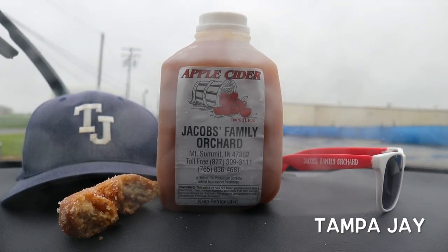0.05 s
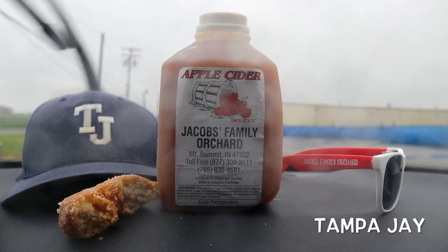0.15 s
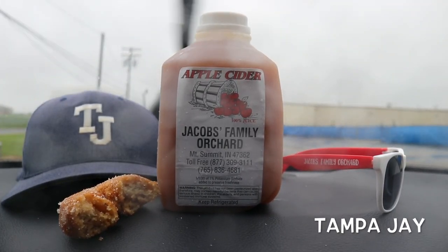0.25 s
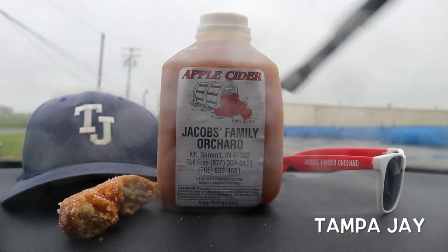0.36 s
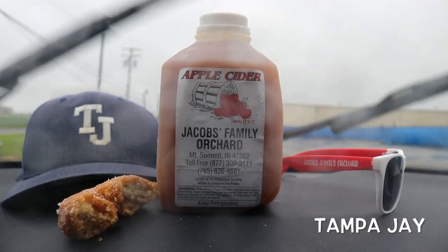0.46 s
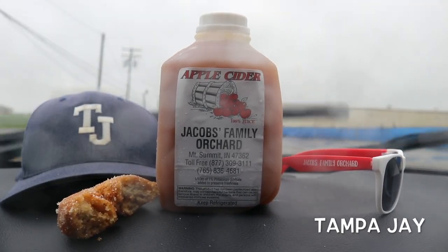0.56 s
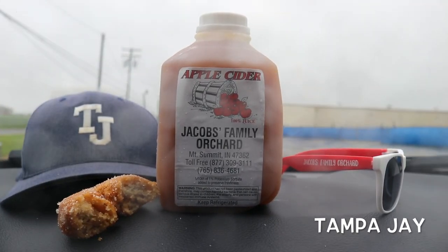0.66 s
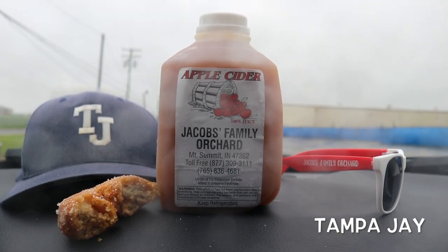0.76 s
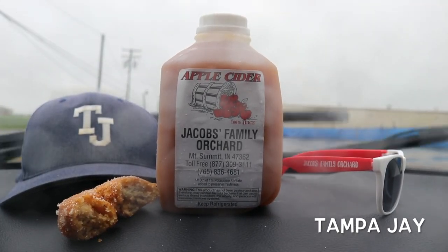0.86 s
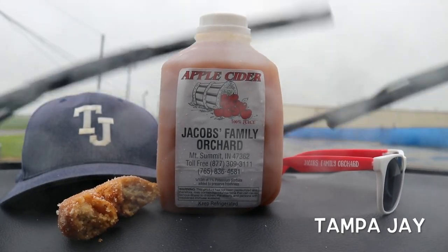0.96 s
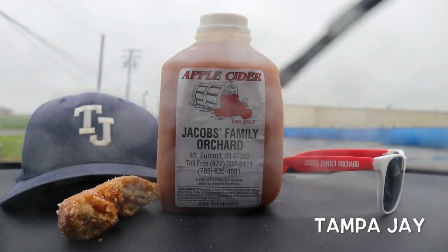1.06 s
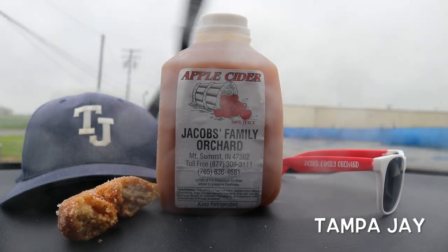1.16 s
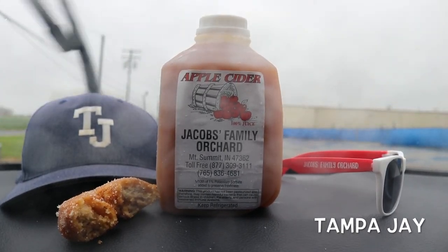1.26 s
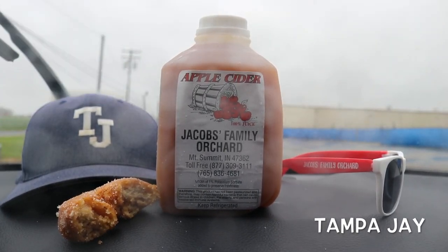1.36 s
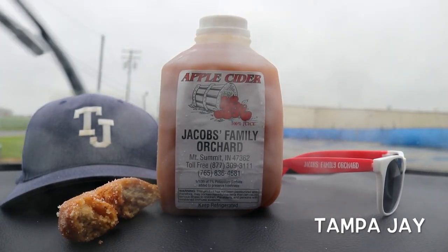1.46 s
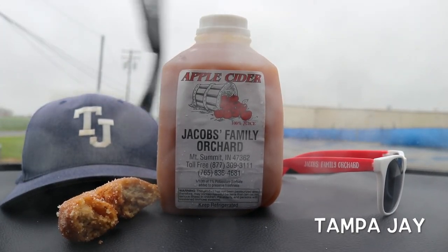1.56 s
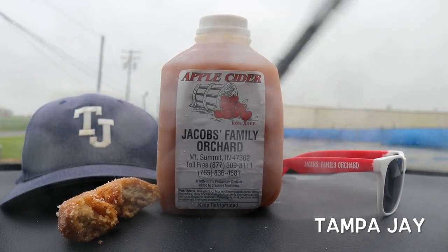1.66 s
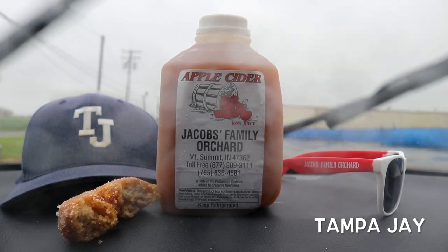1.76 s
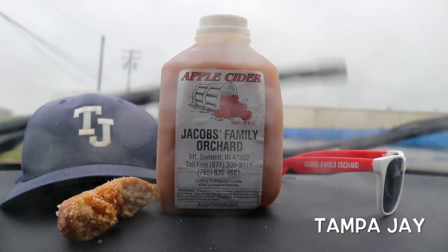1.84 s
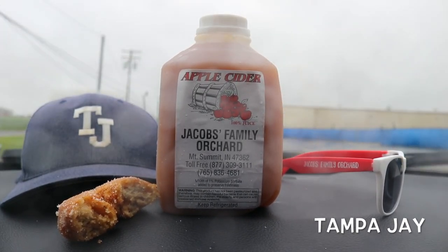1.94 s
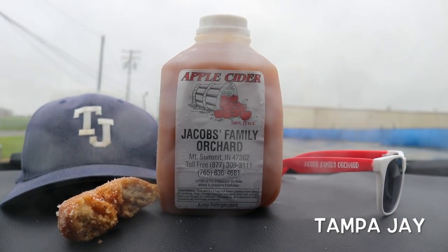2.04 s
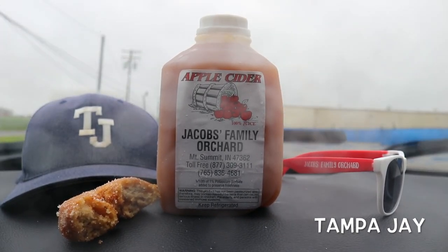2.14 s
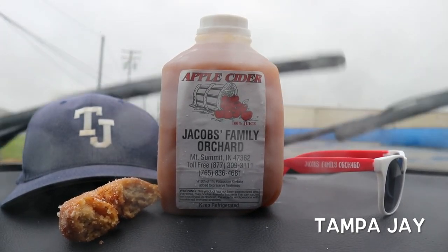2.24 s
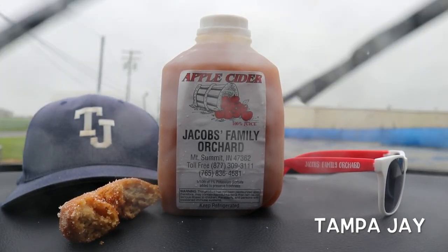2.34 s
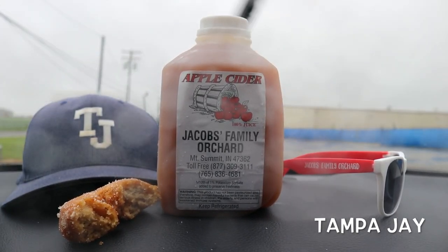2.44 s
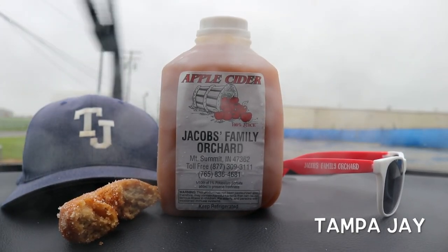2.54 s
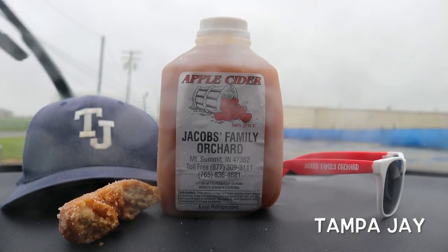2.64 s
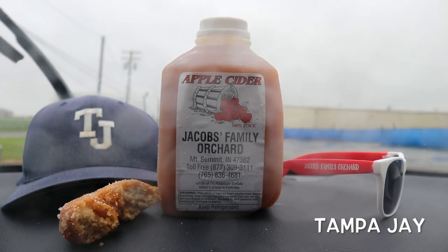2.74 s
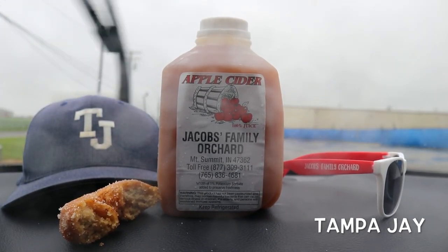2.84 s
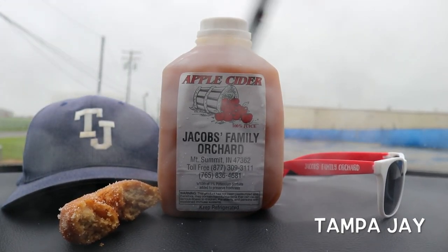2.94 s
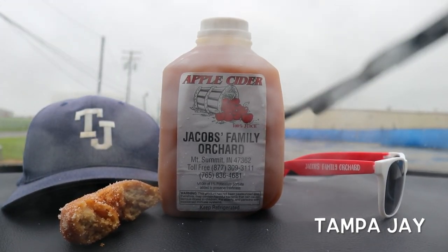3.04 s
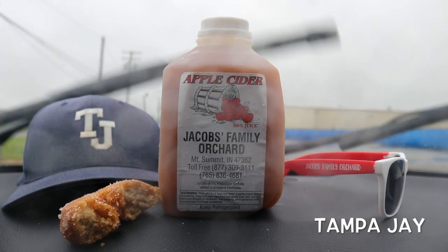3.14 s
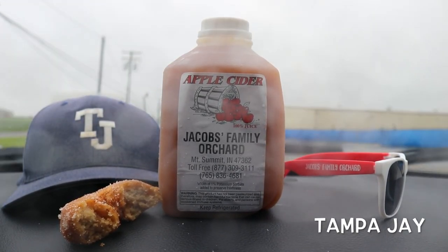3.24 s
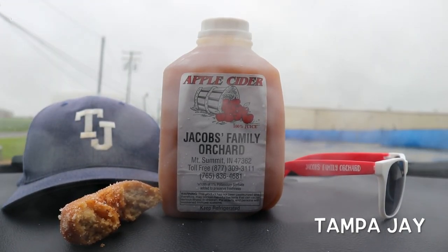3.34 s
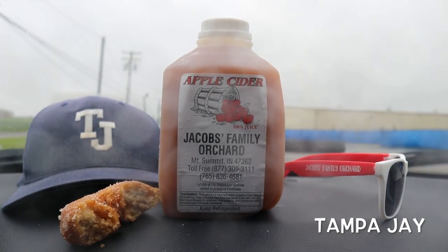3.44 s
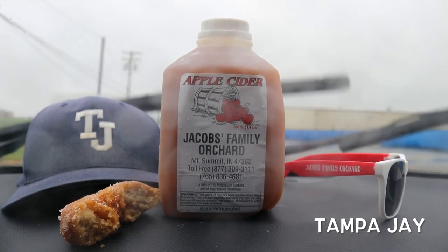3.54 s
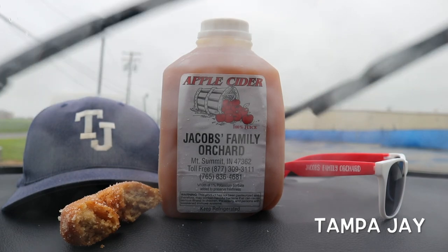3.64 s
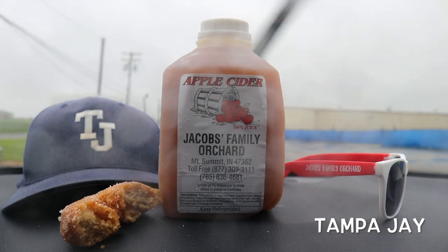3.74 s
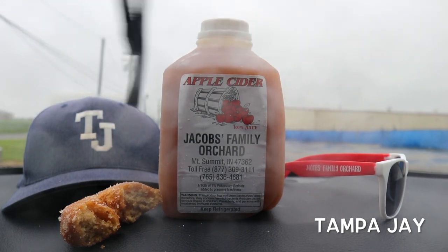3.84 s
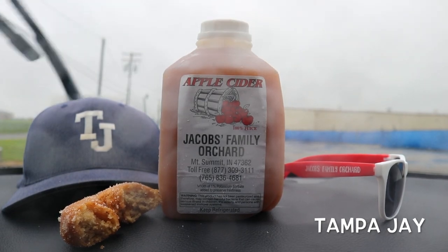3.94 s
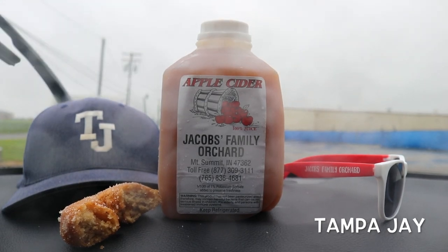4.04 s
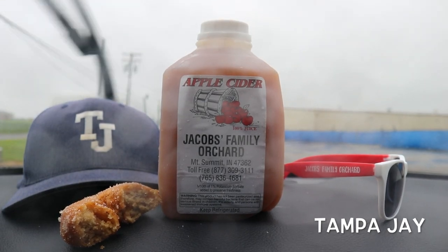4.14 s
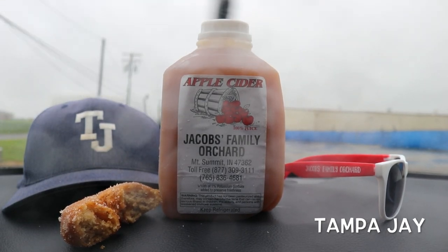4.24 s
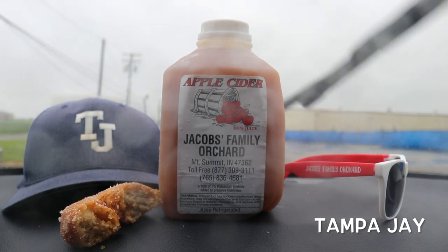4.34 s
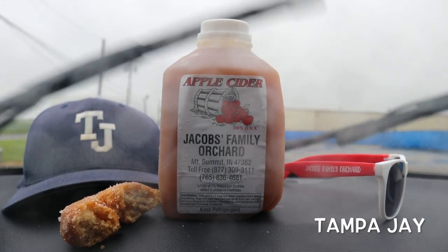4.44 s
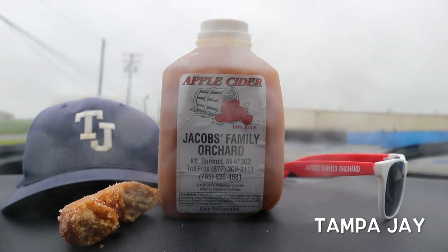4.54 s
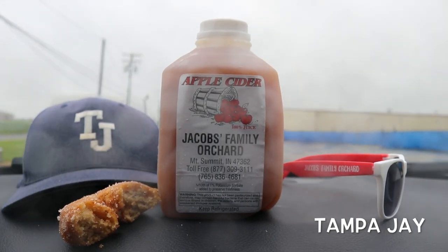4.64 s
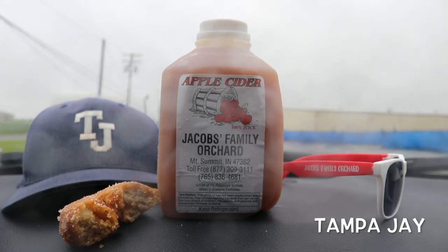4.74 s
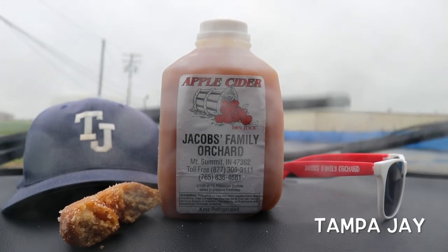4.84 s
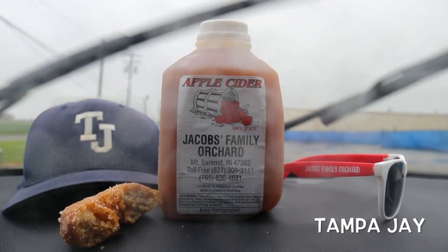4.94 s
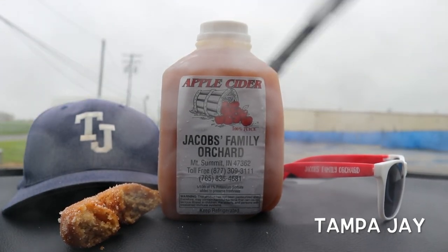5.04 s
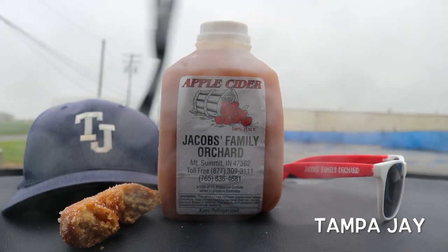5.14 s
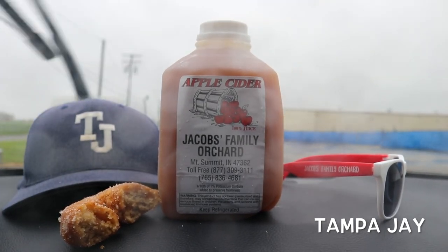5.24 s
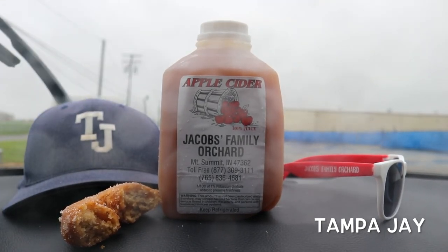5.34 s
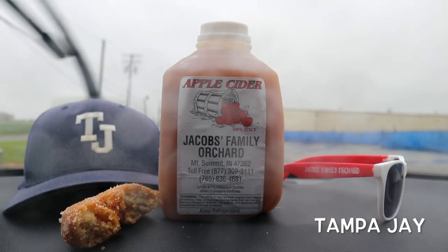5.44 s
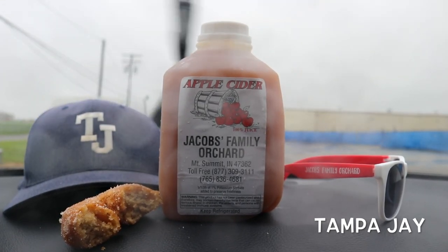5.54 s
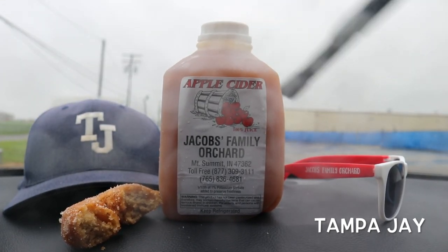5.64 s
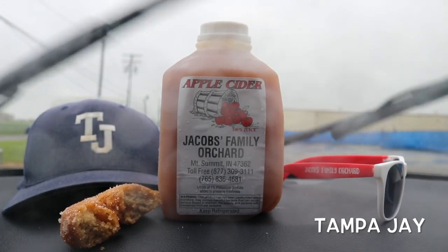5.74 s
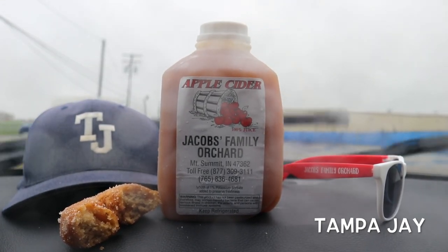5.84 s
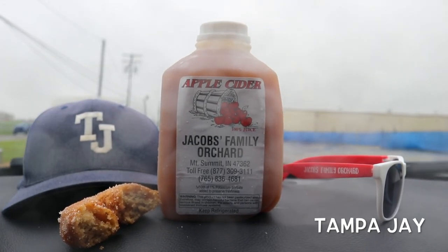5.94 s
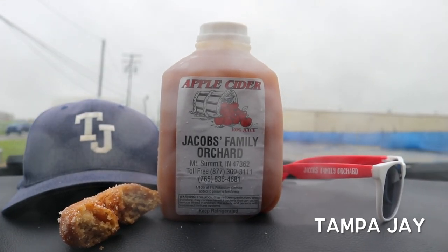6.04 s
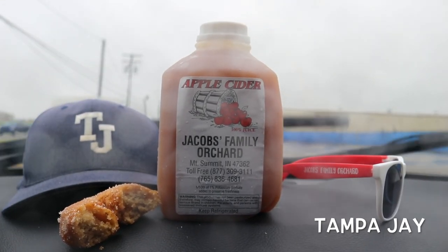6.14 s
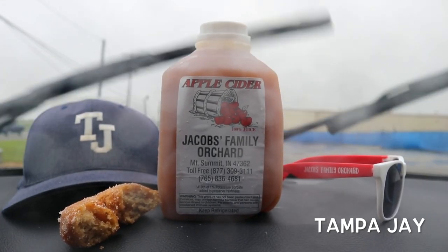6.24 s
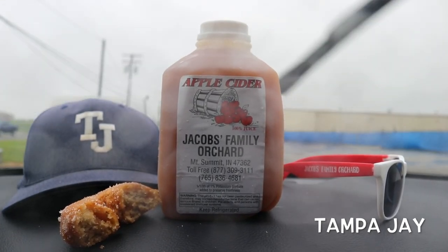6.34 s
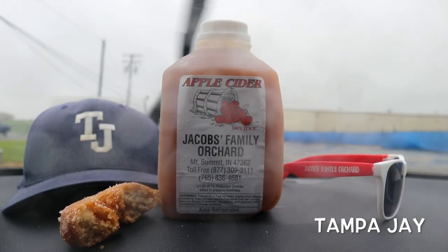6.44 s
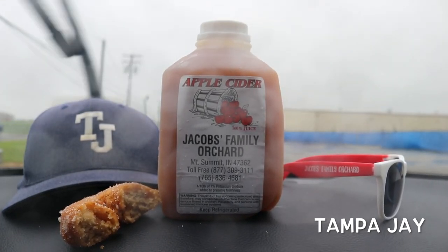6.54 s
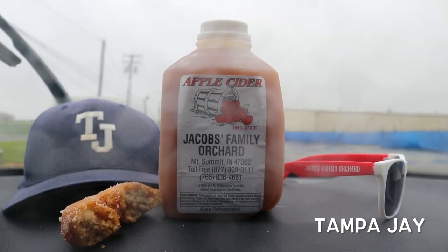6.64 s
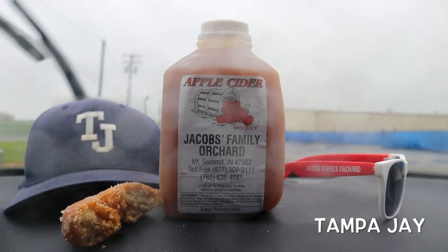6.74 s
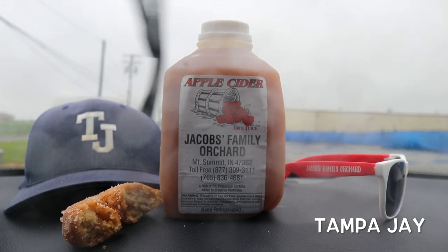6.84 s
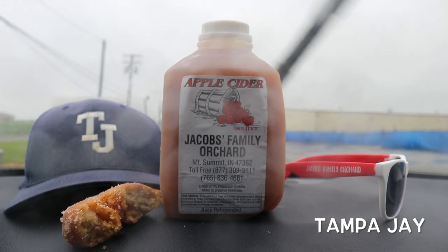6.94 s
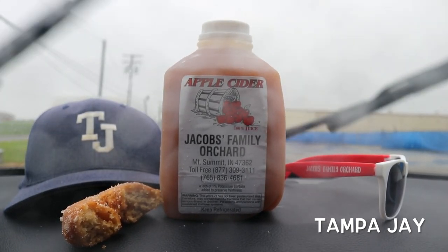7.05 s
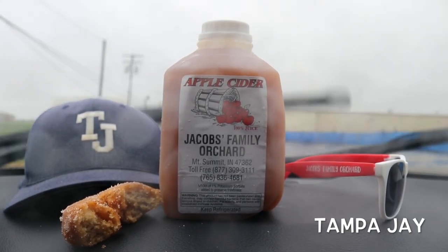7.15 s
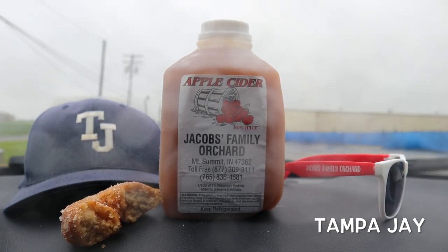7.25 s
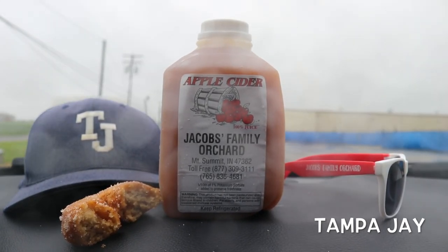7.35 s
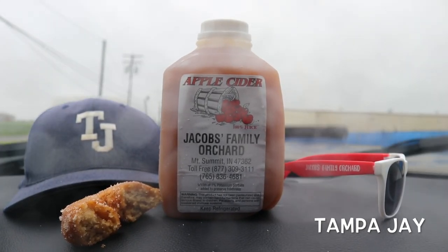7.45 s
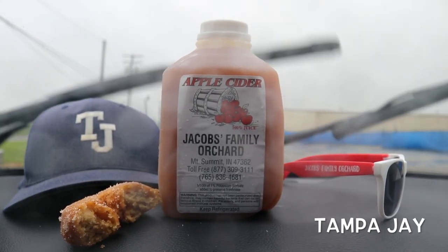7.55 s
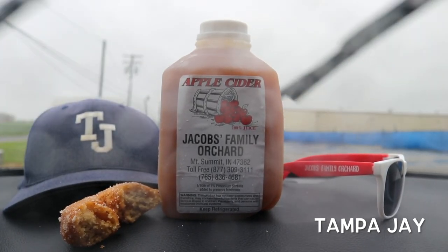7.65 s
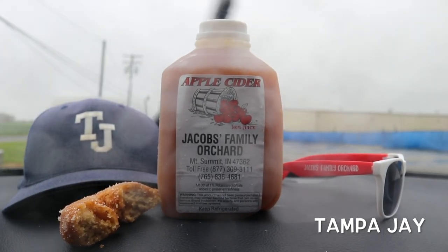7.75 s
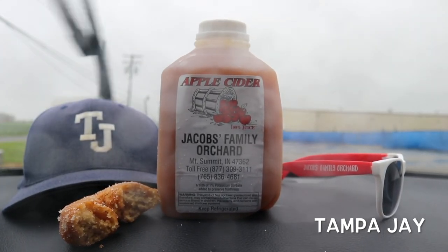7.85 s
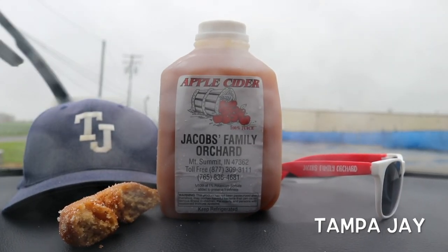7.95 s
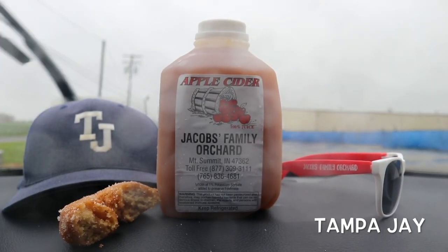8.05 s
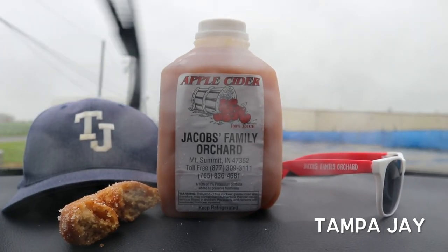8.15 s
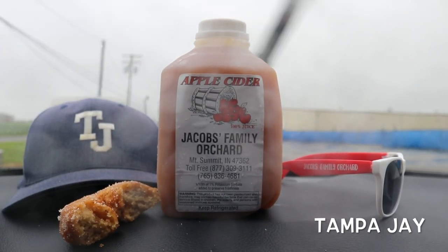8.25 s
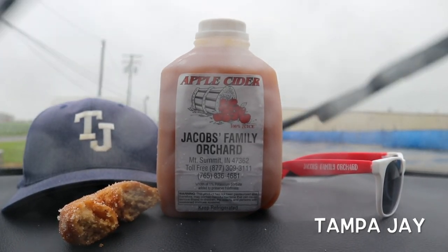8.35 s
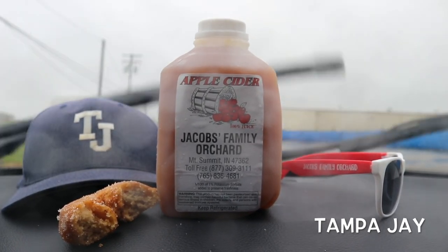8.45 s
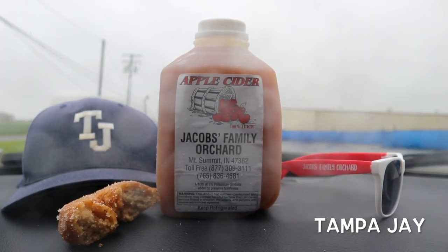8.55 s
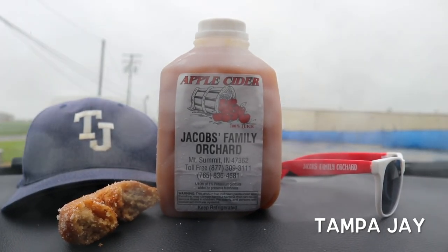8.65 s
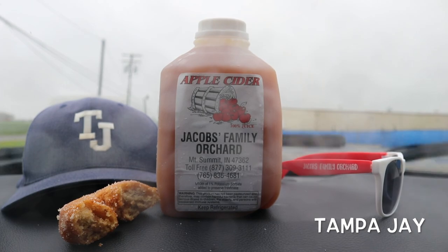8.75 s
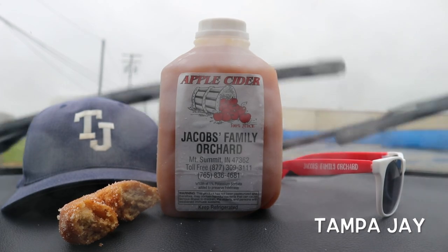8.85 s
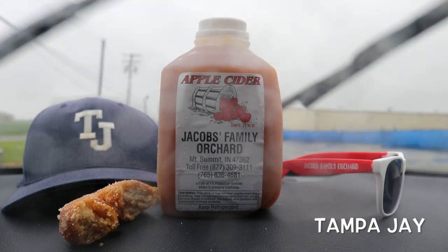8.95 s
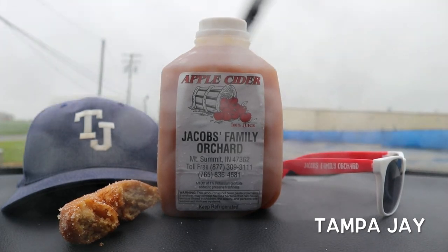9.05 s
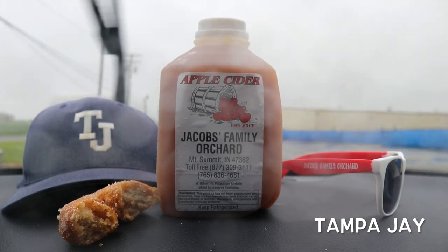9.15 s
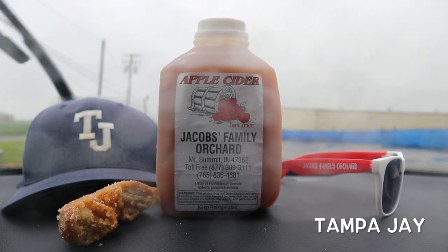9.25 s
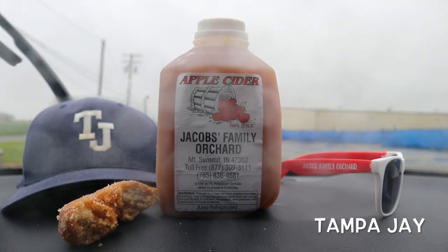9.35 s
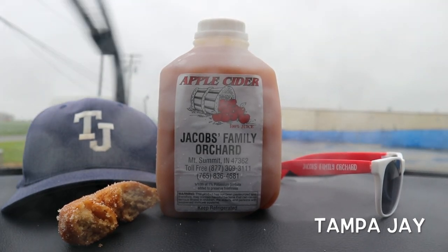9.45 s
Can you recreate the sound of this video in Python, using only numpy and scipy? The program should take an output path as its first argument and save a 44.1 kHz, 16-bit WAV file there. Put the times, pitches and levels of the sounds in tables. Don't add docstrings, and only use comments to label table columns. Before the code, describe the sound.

Heard from inside a parked car: steady rain hisses on the glass, patters on the roof and booms softly in the cabin. A wiper motor whines. About every 1.3 seconds the blades squeak, flip and thump, then judder low across the windscreen, knock heavily at the bottom, slap wetly, and a small relay ticks. Rain dips after each thump and swells back.

```python
import sys
import numpy as np
from scipy import signal
from scipy.fft import rfft, irfft, next_fast_len
from scipy.io import wavfile
from scipy.ndimage import map_coordinates

SR = 44100
rng = np.random.default_rng(int(sys.argv[2]) if len(sys.argv) > 2 else 0)


def transcribe(u):
    v = np.clip(np.atleast_2d(u).T, -1, 1)
    q = np.round(v * 32767).astype(np.int16)
    wavfile.write(sys.argv[1], SR, q)


def makeup_ratio(level_db):
    decades = np.asarray(level_db, float) / 20
    return 10 ** decades


N = 418509
SWEEP_S = 1.3217
GLASS_HZ = 122

# start_s, flip_db, landing_db, rebound_db, swing_db
FAR_TURNS = [(.0855, -3, -7, -2.5, -14), (1.411, -2, -1.5, -3, -12), (2.73, -2.5, -2, -3, -11),
             (4.054, -3.5, -1, -2.5, -12), (5.376, -2.5, -2, -3.5, -12), (6.699, -3.5, -2.5, -3.5, -11),
             (8.018, -3, -1.5, -4, -11), (9.34, -5.5, -3.5, -3.5, -12)]
LAND_S = .0695
# start_s, knock_db, slap_db, swing_db
LOW_PARKS = [(.815, 0.5, -20.5, -10), (2.129, -5, -15, -6.5), (3.456, -3.5, -14.5, -2.5),
             (4.78, 0.5, -19.5, -3), (6.11, -1, -20.5, -27), (7.427, -0.5, -16, -13),
             (8.751, -4.5, -21.5, -26)]


def unit(x):
    return x / np.sqrt(np.mean(x ** 2) + 1e-20)


def along(points, hz):
    f, v = np.transpose(points)
    return np.interp(np.log(hz + 1), np.log(f + 1), v)


def curves(rows):
    s, *cols = np.transpose(rows)
    return [np.interp(np.arange(N) / SR, s, c) for c in cols]


def sweeping(rows):
    s, *cols = np.transpose(rows)
    return [np.interp(np.arange(N) / SR % SWEEP_S, s, c) for c in cols]


def wobble(rate):
    knots = rng.standard_normal(int(N * rate / SR) + 4)
    return map_coordinates(knots, [np.arange(N) * rate / SR])


def filtered(x, response):
    m = next_fast_len(N + SR // 2)
    return irfft(rfft(x, m) * response(np.fft.rfftfreq(m, 1 / SR)), m)[..., :N]


def resonance(hz, centre_hz, width_hz):
    return 1j * hz * width_hz / (centre_hz ** 2 - hz ** 2 + 1j * hz * width_hz)


def tone(hz, rough_hz):
    return np.sqrt(2) * np.sin(2 * np.pi * np.cumsum(hz + rough_hz * wobble(40)) / SR)


def decaying(hz, t, t60):
    return np.sin(2 * np.pi * hz * t) * makeup_ratio(-60 * t / t60)


def add(track, s, sound):
    track[round(s * SR):][:len(sound)] += sound


def cabin(x):
    # pitch_hz, t60_s
    decay = [(150, 0.21), (1500, 0.16), (8000, 0.046)]
    hz, t, z = signal.stft(rng.standard_normal((2, SR // 4)), SR, nperseg=256)
    tail = signal.istft(z * makeup_ratio(-60 * t / along(decay, hz)[:, None]), SR, nperseg=256)[1]
    late = np.pad(x, (150, 0))[None]
    return signal.fftconvolve(late, tail / np.linalg.norm(tail[0]), axes=1)[:, :N]


def drops(spectrum, per_second, spread_db, share, life_s):
    # pitch_hz, correlation
    alike = [(30, .97), (150, .93), (380, .97), (950, .02), (2380, -.12), (5980, -.03), (15000, .05)]
    falls = rng.random((2, N)) < per_second / SR
    sizes = falls * makeup_ratio(spread_db * rng.uniform(-0.11, 1, (2, N)))
    splash = makeup_ratio(-60 * np.arange(2048) / SR / life_s)
    bursts = signal.fftconvolve(sizes, splash[None], axes=1)[:, :N]
    near = unit(bursts * rng.standard_normal((2, N)))
    far = rng.standard_normal((2, N))
    pair = np.sqrt(share) * near + np.sqrt(1 - share) * far

    def mid_and_side(hz):
        turn = np.arccos(np.clip(along(alike, hz), -1, 1)) / 2
        return makeup_ratio(along(spectrum, hz)) * [np.cos(turn), np.sin(turn)]

    mid, side = filtered(pair, mid_and_side)
    return np.array([mid + side, mid - side]) / np.sqrt(np.mean(mid ** 2))


def rain():
    # start_s, strength_db
    strength = [(0, -43.5), (.4, -42.5), (1, -41.5), (1.5, -42), (2, -42), (2.6, -40.5), (3.1, -40.5),
                (3.6, -41.5), (4.2, -41), (4.9, -41), (5.4, -40.5), (6.1, -41.5), (6.9, -41), (7.5, -39),
                (8.2, -41), (8.9, -39), (9.49, -39)]
    # pitch_hz, level_db (per Hz)
    hiss_spectrum = [(880, -17), (1500, -1.5), (1610, -2.5), (1900, -5.5), (2470, -8), (3100, -5.5),
                     (4760, -17.5), (5910, -7.5), (9830, -9), (13800, -14), (15600, -19.5)]
    patter_spectrum = [(470, -6), (800, -4), (831, -5), (1070, -10), (1370, -9), (1890, -17), (3110, -22),
                       (5000, -26.5), (6500, -27.5), (11000, -120)]
    boom_spectrum = [(12, -57), (20, 2.5), (60, -3), (103, -3.5), (125, -14), (183, -1), (300, -9.5),
                     (440, -13), (524, -10), (644, -23), (743, -15), (818, -58), (900, -27.5), (1170, -35),
                     (1980, -120)]
    rain_db, = curves(strength)
    mean_db = rain_db.mean()
    more_db = rain_db - mean_db
    gusts = wobble(20)
    hiss_db = mean_db + more_db + 2.5 + 0.067 * gusts
    patter_db = mean_db + 2.2 * more_db + 13 + 0.35 * gusts + 1.1 * wobble(6.7)
    boom_db = mean_db + 0.66 * more_db + 24.5 + 0.9 * wobble(9) + wobble(6.9)
    hiss = makeup_ratio(hiss_db) * drops(hiss_spectrum, 700, spread_db=-2, share=0.11, life_s=0.0049)
    patter = makeup_ratio(patter_db) * drops(patter_spectrum, 200, spread_db=4, share=0.3, life_s=0.045)
    boom = makeup_ratio(boom_db) * drops(boom_spectrum, 60, spread_db=8, share=0.59, life_s=0.038)
    return hiss + patter + boom


def motor():
    # start_s, pitch_hz, level_db
    gear = [(0, 589, -32), (.12, 580, -29), (.2, 518, -43.5), (.48, 553, -27), (.75, 593, -29.5),
            (.82, 565, -23.5), (.93, 515, -40.5), (1.08, 536, -34), (1.3217, 590, -30.5)]
    # start_s, level_db
    rubbing = [(0, -36), (.12, -19), (.22, -25.5), (.45, -28.5), (.55, -17), (.75, -27.5), (.85, -13),
               (1, -29), (1.1, -26.5)]
    # pitch_hz, width_hz, level_db
    dash_modes = [(535, 45, 0), (740, 50, -6.5)]
    (hz, whine_db), (rub_db,) = sweeping(gear), sweeping(rubbing)
    whine = makeup_ratio(whine_db + .5 + .8 * wobble(22)) * tone(hz, rough_hz=2.5)

    def panel(f):
        return sum(makeup_ratio(db) * resonance(f, centre, width) ** 2 for centre, width, db in dash_modes)

    dash = unit(filtered(rng.standard_normal(N), panel))
    rub = unit(filtered(rng.standard_normal(N), lambda f: resonance(f, 307.7, 80) ** 2))
    return whine, makeup_ratio(0.51 * whine_db - 14.5) * dash + makeup_ratio(rub_db) * rub


def ticks():
    # start_s, peak_db
    relay = [(1.037, -20.5), (2.357, -22.5), (3.6818, -21), (5.0028, -23.5), (6.3275, -19.5),
             (7.646, -17.5), (8.968, -19)]
    # start_s, peak_db, pitch_hz
    cracks = [(0.3367, -8.5, 8900), (0.53, -17, 3350), (0.8793, -24, 3115), (1.5837, -45, 6000),
              (1.8514, -16, 2914), (2.813, -18, 3003), (3.1754, -16.5, 2810), (3.724, -16.5, 2648),
              (4.4975, -20, 2990), (5.8197, -16, 2807), (7.1416, -17, 2986), (7.367, -20, 3647),
              (7.387, -17, 4360), (7.3904, -13, 3950), (7.3941, -49, 2520), (7.3957, -8.5, 4060),
              (7.402, -20, 3800), (7.422, -9.5, 2680), (7.432, -20, 2000), (7.45, -22, 2300),
              (7.46, -25, 2700), (7.526, -23, 2474), (5.0048, -19, 2580), (7.862, -14, 3090),
              (7.9628, -15.5, 3800), (8.0266, -13, 3380), (8.1198, -16, 3283), (8.4447, -13.5, 3370)]
    # (delay s, dB)
    strokes = [(-.0211, -4), (0, 0), (.0014, -3)]
    track, t = np.zeros(N + SR), np.arange(SR // 25) / SR
    for close_s, close_db in relay:
        for delay_s, change_db in strokes:
            ring = decaying(6550, t, .013) + .45 * decaying(5700, t, .009) + .35 * decaying(7900, t, .006)
            crack = np.convolve(rng.standard_normal(len(t)), np.diff(np.hanning(7)), "same")
            crack = crack * makeup_ratio(-60 * t / 0.018)
            add(track, close_s + delay_s, makeup_ratio(close_db + change_db - 4.5) * (ring + 0.4 * crack))
    for s, db, hz in cracks:
        crack = np.convolve(rng.standard_normal(len(t)), np.diff(np.hanning(9)), "same")
        crack = crack * makeup_ratio(-60 * t / .004)
        onset = 1 - np.exp(-t / 0.00015)
        add(track, s, makeup_ratio(db - 2.0) * onset * (decaying(hz, t, .0028) + 0.61 * crack))
    return track[:N]


def swings():
    # start_s, swing_db, half_length_s, pitch_hz
    grabs = [(.37, -11, 0.019, 122), (.44, -7, 0.042, 109.9), (.53, -7, .03, 125.8),
             (.595, -10.5, 0.026, 116), (.885, -8.5, 0.0076, 121.6), (1.777, -6.5, 0.033, 115.1),
             (1.835, -16, 0.026, 128), (1.885, -10, 0.0097, 122), (1.96, -14.5, 0.057, 119),
             (3.083, -6, 0.043, 110.6), (3.18, -7, 0.031, 119.9), (4.415, -7, 0.031, 111),
             (4.48, -7, 0.03, 131.3), (4.527, -6, 0.024, 120.6), (5.732, -5.5, 0.035, 114.4),
             (5.812, -5.5, 0.03, 124.3), (6.2, -12.5, 0.026, 126.4), (7.035, -11.5, 0.017, 116.8),
             (7.08, -6.5, 0.028, 121.3), (7.13, -6, 0.02, 128), (7.21, -13, 0.023, 124.5),
             (7.54, -13, 0.017, 123.7), (7.76, -15, 0.046, 118.4), (8.23, -15.5, 0.0449, 110),
             (8.385, -6, 0.033, 114.9), (8.46, -11, .023, 126), (8.56, -15, 0.0607, 122),
             (8.81, -10.5, .026, 131.5), (8.88, -15, 0.023, 126.4), (9.17, -10, 0.028, 122)]
    linger = 1.15
    climb_hz_per_s = 150
    t = np.arange(N) / SR
    size, pull = np.full(N, 1e-4), np.full(N, 1e-4 * GLASS_HZ)
    rows = list(grabs)
    rows += [(row[0] + .092, row[-1], .011, GLASS_HZ) for row in FAR_TURNS]
    rows += [(row[0] + .037, row[-1], .022, GLASS_HZ) for row in LOW_PARKS]
    for s, db, half_s, hz in rows:
        near = slice(max(0, round((s - .2) * SR)), round((s + .2) * SR))
        late = t[near] - s
        stretch = np.where(late > 0, linger, 1 / linger)
        swell = makeup_ratio(2 * db) * np.exp(-2 * (late / half_s / stretch) ** 2)
        size[near] += swell
        pull[near] += (hz + climb_hz_per_s * late) * swell
    return pull / size, np.sqrt(size - 1e-4 + 1e-12)


def judder():
    # start_s, level_db
    drag = [(0, -27), (.1, -19), (.25, -27.5), (.38, -18), (.65, -17.5), (.76, -26), (.9, -15.5),
            (.99, -26.5), (1.1, -19.5)]
    hz, strength = swings()
    turns = 2 * np.pi * np.cumsum(hz + 2.77 * wobble(40)) / SR
    swing = np.sin(turns)
    swing += .08 * np.sin(2 * turns + 1.3 * wobble(20))
    swing += .045 * np.sin(3 * turns + 1.6 * wobble(20))
    drumming = unit(filtered(rng.standard_normal(N), lambda f: resonance(f, 121.5, 34) ** 2))
    drag_db, = sweeping(drag)
    return np.sqrt(2) * strength * swing + makeup_ratio(drag_db) * drumming / (1 + 1.5 * strength)


def blows():
    # start_s, peak_db, pitch_hz
    knocks = [(0.358, -5.5, 178), (.53, -10.5, 296), (.625, -12.5, 317), (1.83, -9.5, 312),
              (2.079, -8.5, 266), (2.579, -5, 235), (3.007, -5, 191.2), (3.306, -9.5, 265),
              (3.402, -9, 195), (3.901, -6, 236), (5.223, -9.5, 228), (6.169, -4, 195), (6.37, -11.5, 286),
              (7.325, -16, 282.7), (7.37, -7, 214), (7.9, -5.5, 184.6), (8.493, -9, 298.6),
              (8.549, -11, 295.7), (9.15, -6, 225), (9.225, -10.5, 251.7)]
    # start_s, peak_db
    stutters = [(6.174, -24), (7.469, -28), (7.492, -19), (7.526, -20), (7.541, -20)]
    thumps = [(s, db, hz, .07) for s, db, hz in knocks]
    thumps += [(s, db, 292, .065) for s, db, _, _ in LOW_PARKS]
    first = [(s + .015, db) for s, _, db, _ in LOW_PARKS]
    for s, flip_db, land_db, rebound_db, _ in FAR_TURNS:
        thumps.append((s, flip_db, 208, .06))
        thumps.append((s + LAND_S, land_db, 240, .045))
        thumps.append((s + .084, rebound_db, 150, .07))
        first.append((s + LAND_S, land_db - 19))
    again = [(s + .019, db - 5) for s, db in first]
    return thumps, first + again + list(stutters)


def squeak(hz, t):
    full = hz > 1490
    fall = .15 * np.exp(-t / .0035) - .42 / (1 + np.exp((.0155 - t) / .002))
    slide = hz * (1 + full * fall)
    release_db = 30 / (1 + np.exp((.012 + .013 * full - t) / .002))
    grip = (1 - np.exp(-(t / .0035) ** 2)) * makeup_ratio(-60 * t / .09 - release_db)
    rough = np.convolve(rng.standard_normal(len(t)), np.hanning(60), "same") / 4.5
    chatter = 1 + (.45 - .15 * full) * rough
    lead_s = .002 * full
    return lead_s, grip * chatter * np.sin(2 * np.pi * np.cumsum(slide) / SR)


def wipers():
    # pitch_hz, level_db, t60_s
    glass_modes = [(124, -3, .09), (345, 0, .06), (540, -1, .06), (740, -7, .04), (1150, -11, .03)]
    # start_s, peak_db, pitch_hz
    squeaks = [(0.0788, -23.5, 1556), (0.9072, -30.5, 1405), (1.403, -22.5, 1524), (2.7212, -23.5, 1488),
               (3.55, -33, 1363), (4.048, -25, 1520), (5.3704, -25, 1534), (6.189, -27, 1397),
               (6.6917, -25.5, 1545), (7.5087, -28, 1390), (8.0084, -24.5, 1537), (8.833, -28, 1380),
               (9.3317, -25.5, 1587)]
    track, slaps, t = np.zeros(N + SR), np.zeros(N + SR), np.arange(SR // 5) / SR
    thumps, flat = blows()
    for s, db, hz, t60 in thumps:
        ring = np.zeros(len(t))
        for mode_hz, level_db, life_s in glass_modes:
            ring += makeup_ratio(level_db + 2.5 * rng.standard_normal()) * decaying(mode_hz, t, life_s)
        onset = 1 - np.exp(-(t / .002) ** 2)
        blow = makeup_ratio(db) * onset * (.9 * decaying(hz, t, t60) + .27 * ring)
        add(track, s, blow)
        add(track, s + .013 + .002 * rng.standard_normal(), makeup_ratio(-5.5) * blow)
    for s, db in flat:
        grit = rng.standard_normal(len(t)) * (0.54 + (rng.random(len(t)) < .02) * 4)
        add(slaps, s, makeup_ratio(db + 12.0 - 60 * t / 0.049) * (1 - np.exp(-t / 0.0042)) * grit)
    for s, db, hz in squeaks:
        lead_s, cry = squeak(hz, t)
        add(track, s - lead_s, makeup_ratio(db + 8.5) * cry)
    return track[:N] + filtered(slaps[:N], lambda f: resonance(f, 750, 1300) ** 2)


def gain_control():
    moments = (0.18, 0.451, 0.853)
    # turn_db, judder_db, park_db
    depths = [(6.8, 6.5, 2.3), (8, 0.7, 6), (10.2, 3, 3), (8.6, 4, 5), (5.66, 2.5, 0.8), (8.8, 1.1, 1.7),
              (8.4, 3.5, 1.3), (8.5, 0, 0)]
    t = np.arange(N) / SR
    duck_db = np.zeros(N)
    for k, row in enumerate(depths):
        for s, db in zip(moments, row):
            since = np.clip(t - k * SWEEP_S - s, 0, None)
            duck_db += db * np.exp(-since / .7) * (1 - np.exp(-since / .016))
    return makeup_ratio(-duck_db)


def scene():
    # pitch_hz, left_minus_right_db
    tilt = [(30, -3.2), (150, -0.3), (380, -2), (950, -.3), (2380, -1.5), (5980, -3.5), (15000, 1.2)]
    blades, relay = wipers(), ticks()
    whine, hum = motor()
    whine_pair = whine * makeup_ratio([[-4], [2.2]]) + makeup_ratio(-12) * cabin(whine)
    hum_pair = hum * makeup_ratio([[-.4], [.4]]) + makeup_ratio(-14) * cabin(hum)
    rain_pair = filtered(rain(), lambda hz: makeup_ratio(along(tilt, hz) * [[.5], [-.5]]))
    steady = whine_pair + hum_pair + rain_pair
    hits = blades * makeup_ratio([[.6], [-.6]]) + makeup_ratio(-12) * cabin(blades)
    hits += relay * makeup_ratio([[-4], [2.5]]) + makeup_ratio(-10) * cabin(relay)
    glass = judder()
    glass_pair = glass * makeup_ratio([[.3], [-.3]]) + makeup_ratio(-19) * cabin(glass)
    gain = gain_control()
    deep = filtered(steady, lambda hz: 1 / (1 + (hz / 110) ** 4))
    return hits + glass_pair + gain * (steady - deep) + gain ** 0.56 * deep


def top_cut(x):
    return signal.sosfilt(signal.butter(12, 15720, fs=SR, output="sos"), x)


def record(dry):
    held = dry / (1 + np.abs(dry / .8) ** 6) ** (1 / 6)
    return top_cut(held)


dry = scene()
out = record(dry)
transcribe(out)
```